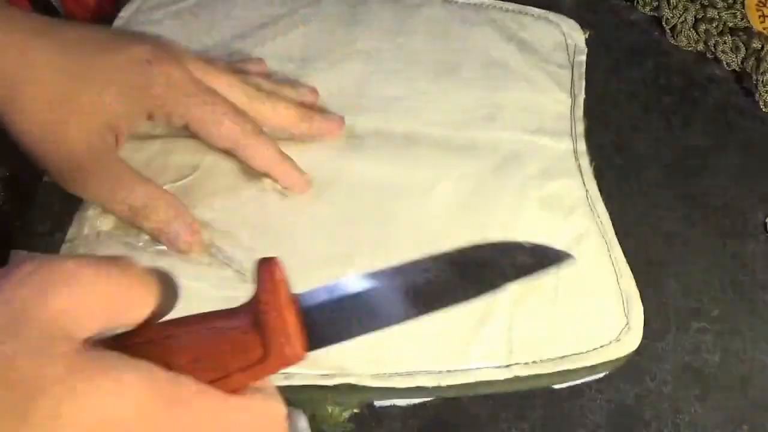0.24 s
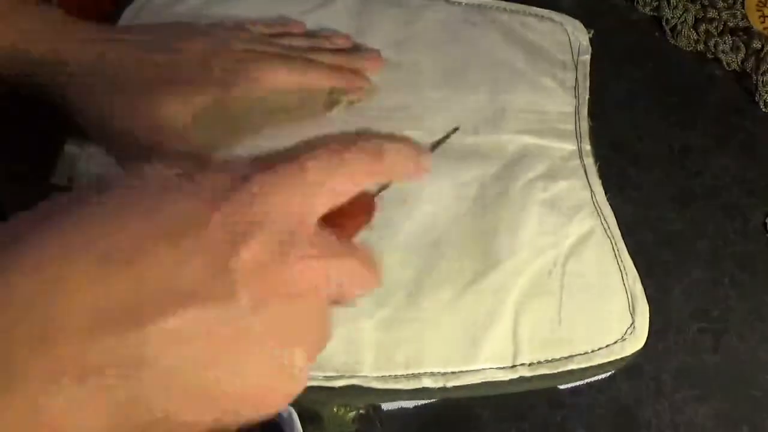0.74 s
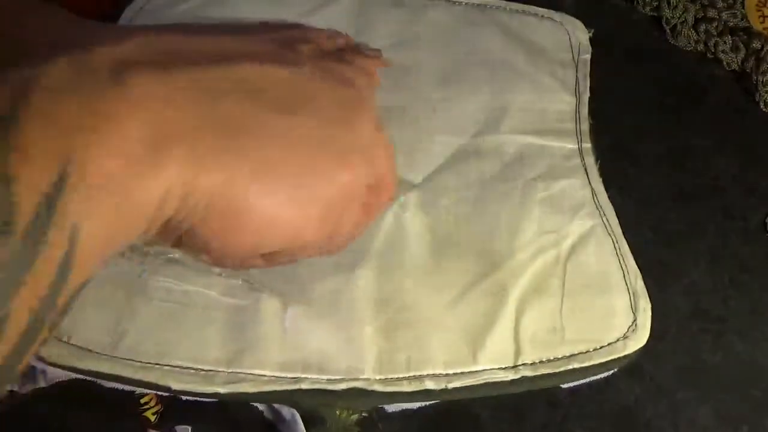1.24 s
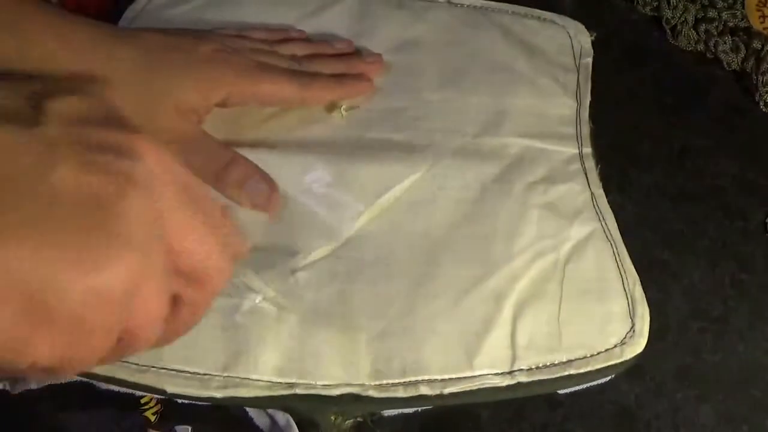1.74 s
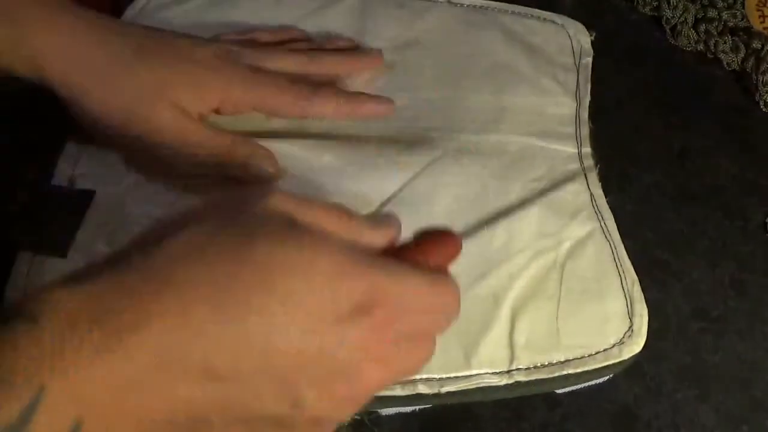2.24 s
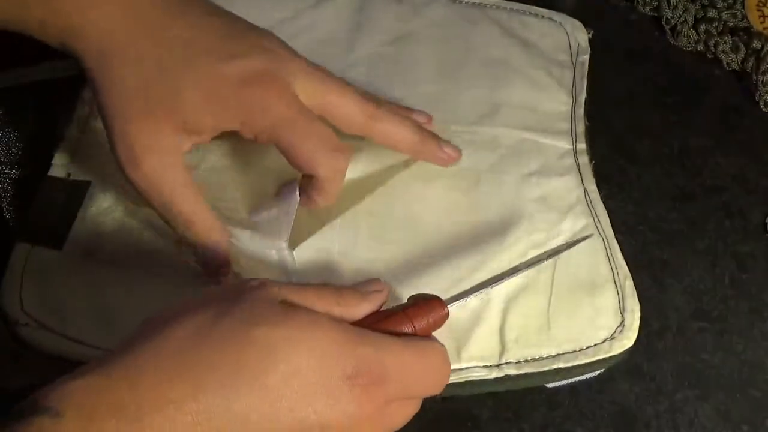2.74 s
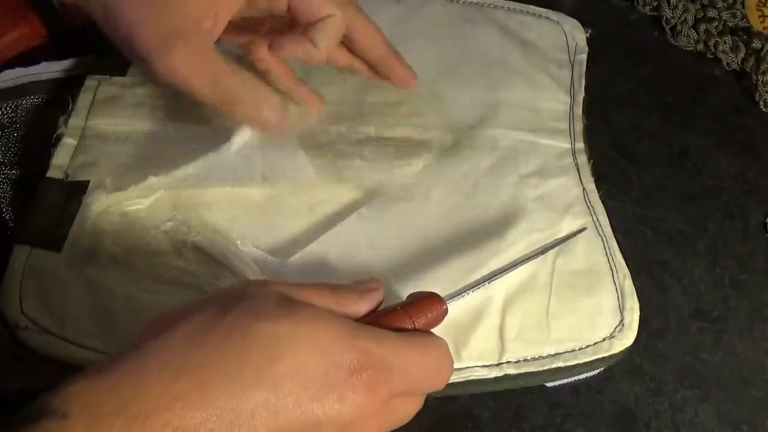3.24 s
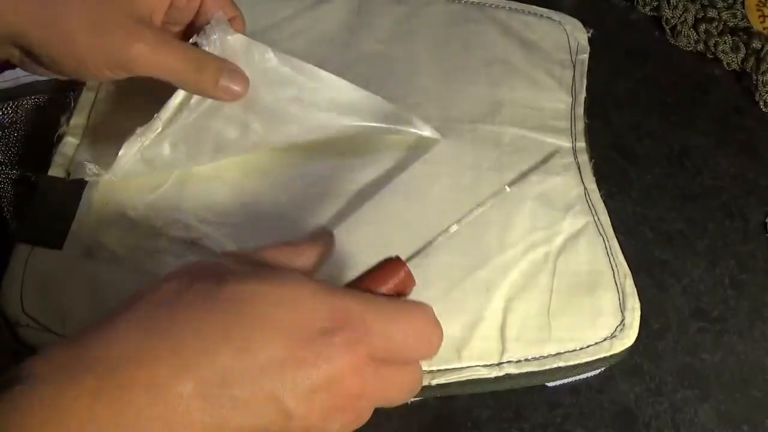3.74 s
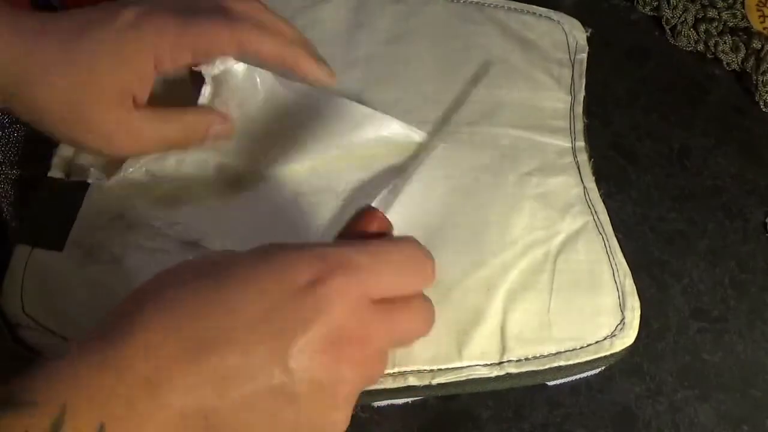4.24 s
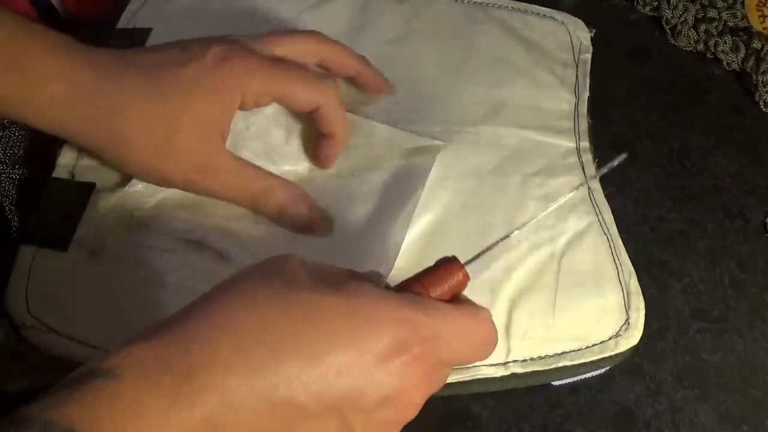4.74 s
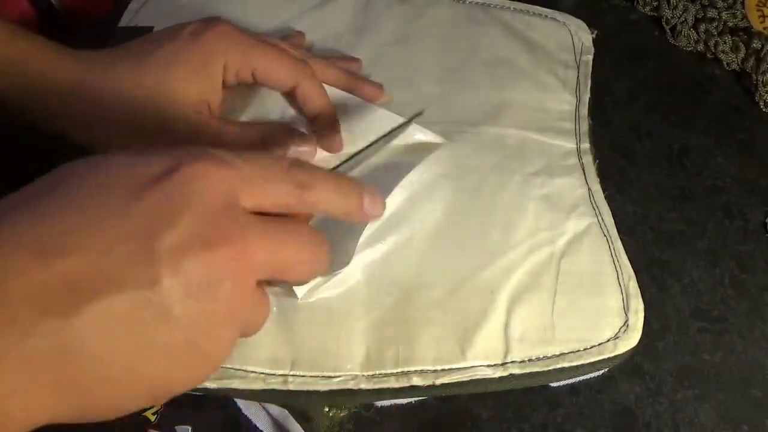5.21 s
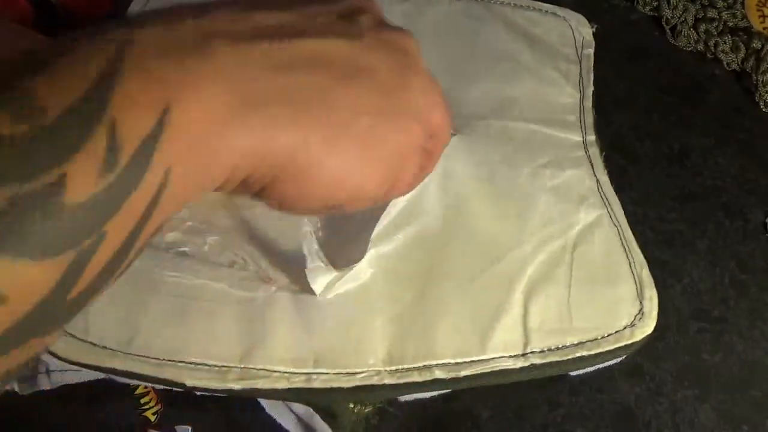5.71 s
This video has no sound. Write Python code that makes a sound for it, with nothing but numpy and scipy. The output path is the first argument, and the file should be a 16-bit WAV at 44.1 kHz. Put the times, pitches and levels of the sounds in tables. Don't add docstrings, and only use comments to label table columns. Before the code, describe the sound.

Up close, a blade rips hissing strokes through a tough padded cover, then fingers lift and crackle its plastic-lined flap before one last, stronger slit.

```python
import sys
import numpy as np
from scipy import signal
from scipy.fft import rfft, irfft
from scipy.io import wavfile
from scipy.ndimage import uniform_filter1d

SR = 44100
rng = np.random.default_rng(int(sys.argv[2]) if len(sys.argv) > 2 else 0)


def nominal_scale(level):
    x = np.asarray(level, float) / 20
    return 10 ** x


def file_out(sig):
    cols = np.atleast_2d(sig).T
    lim = np.clip(cols, -1, 1)
    pcm = np.round(lim * 32767).astype(np.int16)
    wavfile.write(sys.argv[1], SR, pcm)


N = 263277

# (start_s, end_s, blade_hz)
CUTS = [
    (1.12, 1.42, 1800),
    (5.62, 6.1, 2000),
]


def unit(x):
    return x / np.sqrt(np.mean(x ** 2) + 1e-30)


def band(x, lo_hz, hi_hz, order=2):
    return signal.sosfilt(signal.butter(order, [lo_hz, hi_hz], "bandpass", fs=SR, output="sos"), x)


def ring(x, modes):
    out = 0
    for k, (hz, width_hz, level_db) in enumerate(modes):
        out = out + (-1) ** k * nominal_scale(level_db) * band(x, hz - width_hz / 2, hz + width_hz / 2, order=1)
    return out


def walk(rate_hz):
    hold = int(SR / rate_hz)
    steps = np.repeat(rng.standard_normal(N // hold + 1), hold)
    return unit(uniform_filter1d(uniform_filter1d(steps, hold), hold)[:N])


def threads(n, share, spread_db, width):
    draw = rng.random((3, n))
    level_db = np.minimum(-spread_db * np.log(draw[0] + 1e-9), 30)
    size = nominal_scale(level_db) * (draw[1] < share)
    mid = size * np.sign(draw[2] - .5)
    return np.array([mid, width * mid * rng.standard_normal(n)])


def on_log_axis(hz, points):
    point_hz, point_db = np.array(points).T
    return nominal_scale(np.interp(np.log(hz), np.log(point_hz), point_db))


def room_tone():
    # (hz, level_db per Hz)
    room_curve = [(15, -37), (25, -15), (75, 7), (143, 4), (420, -10.5), (1090, -21), (2230, -9),
                  (2470, -32), (2730, -11), (4930, -14.5), (9860, -17), (10600, -16), (11500, -11),
                  (15000, -65), (22000, -120)]
    # (hz, side_minus_mid_db)
    side_curve = [(60, -17), (110, -10.5), (190, -4), (350, 6.5), (620, 14.5), (1120, 18), (2010, 4),
                  (3600, 1), (6460, 0.5), (11600, -1)]
    # (hz, width_hz, rms_db)
    hum_bands = [
        (53.2, 8.3, -65.5),
        (100.5, 5.2, -68),
        (192, 28, -71),
    ]
    hz = np.fft.rfftfreq(N, 1 / SR) + 1
    shape = on_log_axis(hz, room_curve)
    mid = irfft(rfft(rng.standard_normal(N)) * shape, N)
    side = irfft(rfft(rng.standard_normal(N)) * shape * on_log_axis(hz, side_curve), N)
    out = np.array([mid, side]) * nominal_scale(-68) / np.std(mid)
    for hum_hz, width_hz, rms_db in hum_bands:
        hum = band(rng.standard_normal(N), hum_hz - width_hz / 2, hum_hz + width_hz / 2, order=1)
        out[0] += nominal_scale(rms_db + .8 * walk(11)) * unit(hum)
    return out


def effort(share, drags_db, tugs_db, fade, rest_db):
    # (peak_s, rise_s, fall_s, hiss_db, weight_db on the sheet)
    drags = [(0.0, .1, 0.17, -33.5, -12), (.154, 0.11, 0.084, -37, -6.5), (.374, 0.16, 0.074, -60.5, -8),
             (.504, .065, 0.04, -59, -18), (.573, 0.022, 0.12, -53.5, -1), (.7, 0.24, 0.24, -66, -3.5),
             (.893, 0.054, 0.13, -60, -5), (1.135, 0.15, 0.54, -49.5, -8), (1.29, 0.28, 0.29, -41, -8),
             (1.385, 0.19, .09, -39.5, -11), (1.47, .1, 0.43, -53.5, -12), (1.55, 0.2, 0.12, -58, -11),
             (1.648, 0.26, 0.032, -49, -14), (1.7, .05, 0.09, -64, -14), (1.826, 0.37, .19, -52.5, -7),
             (2.17, 0.15, 0.35, -57, -6.5), (2.2, 0.014, 0.043, -56, -1), (2.235, 0.066, 0.091, -54, 0),
             (2.265, .09, 0.088, -46, -3.5), (2.295, 0.053, 0.031, -53, -3), (5.57, 0.51, 0.24, -62, -1.5),
             (5.69, 0.14, 0.64, -41, -4), (5.91, 0.15, 0.55, -35.5, -3)]
    # (peak_s, rise_s, fall_s, hiss_db, weight_db on the sheet)
    tugs = [(2.5, 0.17, 0.13, -56, -6.5), (2.819, 0.16, 0.093, -52.5, -11.5),
            (2.935, 0.045, 0.069, -43, -8), (2.993, 0.037, 0.076, -50.5, 7), (3.078, 0.099, 0.051, -46, -8),
            (3.253, 0.21, 0.13, -59.5, -10), (3.375, .015, .05, -50.5, -11),
            (3.397, 0.027, 0.025, -42, -16.5), (3.435, 0.09, 0.04, -49.5, -9),
            (3.532, 0.099, 0.27, -55, -8.5), (3.86, 0.36, 0.52, -67.5, 2), (3.98, 0.34, 0.21, -56, -11),
            (4.121, 0.096, 0.39, -49, -4), (4.295, 0.14, 0.13, -46.5, -6),
            (4.335, 0.067, 0.18, -52.5, -4.5), (4.548, 0.075, 0.036, -50.5, -6),
            (4.679, 0.29, 0.47, -47.5, -8.5), (4.834, 0.41, 0.085, -51.5, -2.5),
            (4.984, 0.17, 0.22, -61, -5), (5.105, 0.078, 0.1, -50.5, -8.5), (5.148, 0.036, 0.042, -53, 0),
            (5.313, 0.012, 0.029, -63, 12.5), (5.418, 0.038, 0.039, -53.5, -2)]
    fade_db, fade_bend = 24, 1.073
    t = np.arange(0, N + 64, 64) / SR
    power = nominal_scale(2 * rest_db)
    for rows, kind_db in ((drags, drags_db), (tugs, tugs_db)):
        for s, rise, fall, hiss_db, weight_db in rows:
            away = np.maximum((s - t) / max(rise, .01), (t - s) / max(fall, .01))
            peak_db = hiss_db + kind_db + share * weight_db
            power = power + nominal_scale(2 * (peak_db - fade * fade_db * away ** fade_bend))
    return np.interp(np.arange(N) / SR, t, 10 * np.log10(power))


def patchy(x, edges_hz, patchy_db):
    out = 0
    for k, (lo, hi) in enumerate(zip(edges_hz, edges_hz[1:])):
        out = out + nominal_scale(patchy_db * walk(17)) * band(x, lo, hi) * (-1) ** k
    return unit(out)


def blade_ridge(sheet):
    # (hz, width_hz, level_db)
    sheet_modes = [(1200, 330, -10), (1890, 138, 5), (2570, 1030, -1.5), (3264, 660, 3)]
    t = np.arange(N) / SR
    out = unit(.5 * band(sheet, 870, 3330, order=1) + ring(sheet, sheet_modes))
    for start, end, hz in CUTS:
        share = .75 * np.clip(np.minimum(t - start, end - t) / .05, 0, 1)
        out = (1 - share) * out + share * unit(band(sheet, hz - 260, hz + 300, order=1))
    return out


def rubbing():
    # (share of the weight, drags_db, tugs_db, share of the fade, rest_db)
    layers = [
        (0.015, -1.06, -0.34, 1.007, -73.5),
        (0.42, -6, -2.1, 0.94, -75.5),
        (.99, -0.8, 1, 0.91, -73),
        (1, -6.5, -2.5, 0.84, -70),
        (0.67, -17, -23, 0.59, -84),
        (1, -53, -11.5, 1.26, -84),
    ]
    # (hz, width_hz, level_db)
    table_modes = [
        (190, 31, -4),
        (365, 460, -24),
    ]
    hiss_db, blade_db, sheet_db, pad_db, table_db, stuffing_db = (effort(*layer) for layer in layers)

    grip = nominal_scale(1.1 * walk(70) + 1.2 * walk(250))
    fine = grip * threads(N, share=.25, spread_db=2.0, width=0.35)
    coarse = grip * threads(N, share=.25, spread_db=2.0, width=0.35)

    fibres = patchy(fine, np.geomspace(5800, 12500, 5), patchy_db=0.85) * np.std(fine)
    fibre_peak = nominal_scale(0.87 * walk(35)) * band(fine, 9360, 9800, order=1)
    hiss = unit(0.48 * fibres + 0.52 * fibre_peak)
    out = nominal_scale(hiss_db + 0.61 * walk(60)) * hiss * np.array([[1], [.7]])

    blade = patchy(coarse, np.geomspace(3200, 6600, 5), patchy_db=1.8)
    out += nominal_scale(blade_db + 1.1 * walk(50)) * blade

    sheet = band(fine, 960, 2520, order=1)
    out += nominal_scale(sheet_db + 0.64 * walk(40)) * blade_ridge(sheet)

    pad = unit(band(coarse, 280, 1000))
    out += nominal_scale(pad_db + 1.8 * walk(45)) * pad * np.array([[1], [.7]])
    stuffing = unit(band(coarse, 290, 450))
    out += nominal_scale(stuffing_db + 2.2 * walk(22)) * stuffing * np.array([[1], [.5]])

    t = np.arange(N) / SR
    press = sum(np.clip(np.minimum(t - start, end - t) / .02, 0, 1) for start, end, _ in CUTS)
    table = unit(ring(band(fine, 184, 540), table_modes))
    return out + nominal_scale(table_db + 3.5 * press) * table * np.array([[1], [.3]])


def sings():
    # (middle_s, half_length_s, pitch_hz, rms_db)
    slides = [(0.02, .03, 7830, -46), (1.19, .04, 7170, -56), (2.245, .012, 1930, -52),
              (2.268, .008, 2100, -51), (3.398, 0.0051, 2730, -52), (3.434, 0.0048, 3300, -56),
              (3.445, 0.004, 3300, -51), (4.264, 0.039, 4480, -56), (4.324, 0.013, 5700, -52),
              (4.328, .015, 4310, -51.5), (4.687, .035, 8600, -61), (4.742, .03, 3890, -57),
              (4.82, 0.04, 4400, -58), (4.84, .03, 3930, -62), (4.987, .012, 8200, -64),
              (5.026, .022, 8110, -64), (5.075, .03, 1260, -60.5), (5.117, 0.027, 1280, -58.5),
              (5.16, 0.012, 1400, -56)]
    width_hz = 255
    t = np.arange(N) / SR
    clicks = threads(N, share=0.22, spread_db=2.5, width=0.27)
    out = 0
    for s, half, hz, rms_db in slides:
        swell = np.exp(-((t - s) / half) ** 4)
        out = out + nominal_scale(rms_db) * swell * unit(band(clicks, hz - width_hz / 2, hz + width_hz / 2))
    return out


def camera_tick():
    first_s, period_s, length_s = .01, .04, .0026
    t = np.arange(N) / SR
    lag = (t - first_s + period_s / 2) % period_s - period_s / 2
    blip = np.exp(-(lag / length_s) ** 2) * np.sin(2 * np.pi * 2460 * lag)
    return nominal_scale(-61.5 + 1.2 * walk(25)) * blip * np.array([[1], [.1]])


def burst(t60, rattle_db, crack):
    t = np.arange(8192) / SR
    rattle = unit(threads(8192, share=0.33, spread_db=4.0, width=0.29))
    out = nominal_scale(rattle_db - 60 * t / np.clip(t60, .01, .3)) * rattle
    out[:, :len(crack)] += crack * np.array([[1], [0.12 * rng.standard_normal()]])
    return out


def add(out, s, peak_db, y):
    at = int(s * SR)
    out[:, at:at + y.shape[1]] += nominal_scale(peak_db) * y / np.max(np.abs(y[0]))


def knocks():
    # (start_s, peak_db, low_hz, fold_mode_db)
    tip_taps = [(.557, -39, 565, 3), (.571, -33.5, 550, 0), (.158, -34.5, 546, -17), (.315, -52, 530, -15),
                (.389, -50, 700, -7), (.8793, -24.5, 760, -4.5), (.8804, -24, 666, -9),
                (.8865, -32, 597, -24), (1.348, -34.5, 660, -5), (2.1925, -34.5, 684, -1.5),
                (2.4095, -42.5, 583, -9), (3.512, -43.5, 1180, -8), (4.909, -47, 740, -13)]
    wide_folds = [(0.1405, -31, 820, 1), (2.343, -47, 730, -13), (2.364, -40.5, 700, -1),
                  (2.833, -33.5, 495, 5), (2.937, -22, 750, -5.5), (2.945, -29, 1300, 0),
                  (2.985, -19.5, 1150, -13), (3.342, -43, 1200, -4), (4.161, -36, 1120, 6),
                  (4.1678, -29, 1140, -5.5), (4.284, -35, 1150, -1), (4.293, -26.5, 1117, 0.5),
                  (4.32, -37, 1210, 3), (4.8365, -31, 1230, -20), (5.101, -46, 1270, -30)]
    flap_folds = [(1.992, -45, 760, -6), (2.171, -33.5, 1250, 22), (2.9809, -10.5, 740, 1),
                  (2.9833, -7.5, 1170, 8), (2.994, -33, 1150, 5), (3.062, -35.5, 1200, -12),
                  (3.189, -44, 665, 10), (3.394, -41, 1150, 20), (3.408, -45, 1500, 0),
                  (3.6446, -34, 1130, 23), (3.848, -46, 580, -16), (4.108, -21, 513, 3),
                  (4.115, -15.5, 1200, -0.7), (4.246, -37, 1160, -11), (4.277, -36, 1150, -8),
                  (4.463, -38, 904, 22), (4.666, -28.5, 815, -4.5), (4.6686, -29.5, 900, -3),
                  (4.706, -39, 980, -14), (5.145, -24.5, 1280, -8.5), (5.31, -24.5, 1125, -3.5),
                  (5.408, -25.5, 1120, -4), (5.45, -42, 700, -21)]
    tight_folds = [(2.925, -28, 1700, 6.2), (2.9376, -23, 760, 11), (2.994, -25, 1400, 10),
                   (3.373, -48, 990, 3.5), (3.43, -53, 1450, 6), (3.4438, -32.5, 1100, 4.5),
                   (3.685, -39.5, 1020, 3)]
    # mode hz, and rattle decay t60_s
    fold_modes_hz = (1776, 2040, 2510, 3300)
    fold_decays_s = (0.078, 0.077, 0.042, 0.041)
    # (hz, width_hz, level_db)
    pad_modes = [
        (417, 297, -3),
        (704, 60, -23),
    ]
    out, push = np.zeros((2, N + 8192)), np.hanning(11)
    kinds = (tip_taps, wide_folds, flap_folds, tight_folds)
    for rows, fold_hz, t60 in zip(kinds, fold_modes_hz, fold_decays_s):
        for s, peak_db, low_hz, high_db in rows:
            high_hz = fold_hz * (1 + 0.0038 * rng.standard_normal())
            hit = band(burst(t60, rattle_db=-14.5, crack=push), 110, 10500, order=1)
            click = [(low_hz, 0.38 * low_hz, 0), (high_hz, .5 * high_hz, high_db)]
            after = [(low_hz, 130, 3), (high_hz, 110, high_db + 3.5)]
            add(out, s, peak_db, ring(hit, click) + ring(hit, after) + 0.18 * ring(hit, pad_modes))
    return out[:, :N]


def crackles():
    # (start_s, peak_db, brightest_hz, rattle_db under the crack)
    shut = [(.1415, -8.5, 9750, -15), (.307, -46, 5600, -4), (.296, -47, 10000, -12),
            (.3885, -36, 7500, -18), (.5556, -30, 10000, -7), (.879, -32.5, 7540, 6),
            (1.492, -33, 9540, -15), (1.505, -34, 8350, -9), (1.535, -33, 9000, -12),
            (1.562, -33.5, 8550, -10.5), (1.659, -33, 8500, -14), (1.6935, -37.5, 9000, -12),
            (1.7104, -32, 8000, -18), (1.719, -23.5, 10400, -16.5), (1.807, -34, 8850, -8),
            (1.837, -37, 8000, -10), (1.874, -41, 9500, -10), (2.17, -29.5, 10100, -20),
            (2.1926, -21.5, 10300, -9), (2.1985, -39, 10000, -14), (2.2075, -40, 9900, -10),
            (2.3415, -36, 9040, -4), (2.3642, -25.5, 9350, -14), (2.3715, -33, 7450, -15),
            (2.378, -43, 7800, -12), (2.5296, -34.5, 9860, -21), (2.5494, -38, 10400, -14),
            (2.558, -43, 7040, -14), (2.58, -49, 5500, -10), (2.637, -47, 5000, -8),
            (2.655, -44, 9870, -10), (2.667, -47, 5500, -14), (2.712, -43.5, 8450, 0),
            (2.722, -43, 7500, -3), (2.8, -41, 7000, -7), (2.834, -28, 10300, -3),
            (2.9243, -19, 10600, -22), (2.9364, -23, 8550, 3), (2.9775, -25, 5000, 6),
            (2.9801, -10.5, 9900, 14)]
    # (start_s, peak_db, brightest_hz, rattle_db under the crack)
    opened = [(3.023, -27, 8000, 9), (3.0649, -25, 6550, 8), (3.1652, -39, 10100, -3),
              (3.1892, -36.5, 10600, -3.5), (3.338, -34, 10400, -5), (3.3735, -34, 10600, 0),
              (3.394, -32, 9300, -11), (3.3962, -26.5, 9800, -17), (3.416, -35, 8500, -8),
              (3.4438, -27, 9500, -17), (3.542, -35, 4300, -18), (3.6095, -34, 9400, -1),
              (3.6447, -27, 5570, -11), (3.6852, -25.5, 6460, -4), (3.9569, -39.5, 6070, -6),
              (3.9936, -40, 8500, -14), (4.031, -35.5, 8660, -3.5), (4.1074, -25, 4270, -2),
              (4.1152, -17.5, 3930, 8), (4.1465, -24, 9400, -2), (4.277, -28, 5500, -8),
              (4.463, -37, 7570, -1), (4.5446, -37, 4970, -1.1), (4.6503, -35, 5800, -3),
              (4.666, -26, 9600, 3), (4.7706, -31, 6760, 4), (4.79, -33, 6000, 3), (4.8344, -38, 4470, -4),
              (5.1444, -28.5, 7250, -17), (5.2959, -35, 10000, 6), (5.3093, -38.5, 8400, -3),
              (5.4086, -35.5, 9540, -1.1)]
    out, k = np.zeros((2, N + 8192)), np.arange(80)
    for rows, t60 in ((shut, 0.059), (opened, 0.066)):
        for s, peak_db, hz, rattle_db in rows:
            tone = np.cos(2 * np.pi * hz * k / SR)
            crack = 2 * np.exp(-k / 14) * (tone + .6 * rng.standard_normal(80))
            snap = burst(t60, rattle_db, crack)
            hit = band(snap, 3750, 14740) + 0.23 * band(snap, 1500, 3800, order=1)
            add(out, s, peak_db, 0.71 * hit + 0.54 * band(hit, 1.04 * hz, 1.17 * hz, order=1))
    return out[:, :N]


def thuds():
    # (start_s, peak_db, low_hz, upper_mode_db, deep_mode_db)
    strikes = [(0.154, -26.5, 196, -6.5, -11), (.275, -52, 111, -8, 3), (.562, -45.5, 133, 4, -15),
               (.63, -50, 143, 2, 3), (.879, -33.5, 181, -5, -10), (1.3, -52, 110, -8, -3),
               (1.345, -54, 105, -4, -3), (2.515, -47.5, 233, -1, -17), (2.937, -26, 210, 12.5, -18),
               (2.982, -19, 217, 10, -22.5), (3.0596, -31, 187, 2, -19), (3.345, -50, 119, 0, 8),
               (3.38, -50, 110, 3, 4), (3.686, -40, 245, 9, -24), (4.113, -25, 220, 11.5, -24),
               (4.25, -44, 300, 1, -13), (4.298, -34, 255, 21, -16), (5.144, -42.5, 225, 4, -20),
               (5.307, -39.5, 222, 12, -20.5), (5.406, -38.5, 159, 13, -15), (5.63, -52, 110, -4, 6),
               (5.877, -47, 192, 5, -5), (5.935, -45, 188, -10, -15)]
    out, t = np.zeros((1, N + 16384)), np.arange(16384) / SR
    for s, peak_db, hz, upper_db, deep_db in strikes:
        t60 = 11.9 / hz * np.exp(-0.1171 * upper_db)
        low = np.sin(2 * np.pi * hz * t)
        upper = nominal_scale(upper_db - 40 * t / t60) * np.sin(2 * np.pi * 420 * t)
        top = (low + upper) * nominal_scale(-60 * t / t60)
        top += .14 * np.sin(2 * np.pi * .9 * hz * t) * nominal_scale(-60 * t / (2.4 * t60))
        deep = nominal_scale(deep_db - 60 * t / 0.28) * np.sin(2 * np.pi * 70 * t) * (1 - np.exp(-t / 0.0043))
        add(out, s + 0.00177, peak_db, (1 - np.exp(-t / 0.001)) * (top + deep)[None])
    return out[:, :N] * np.array([[1], [.08]])


def scene():
    near = rubbing() + knocks() + crackles() + thuds() + sings()
    t = np.arange(8192) / SR
    tail = rng.standard_normal((2, 8192)) * nominal_scale(-60 * t / 0.082) * (t > .003)
    tail *= 1 + 0.79 * np.exp(-((t - .007) / 0.001) ** 2)
    tail = nominal_scale(-15) * tail / np.sqrt(np.sum(tail[0] ** 2))
    tail[1] = .5 * band(tail[1], 450, 6000, order=1)
    reverb = signal.fftconvolve(near[:1], tail, axes=1)[:, :N]
    mid, side = near + reverb + room_tone() + camera_tick()
    return np.array([nominal_scale(-0.1) * (mid + side), mid - side])


def roll_off(x):
    return signal.sosfilt(signal.butter(12, 12200, fs=SR, output="sos"), x)


def record(dry):
    firm = signal.sosfilt(signal.butter(2, 38, "highpass", fs=SR, output="sos"), dry)
    mix = signal.sosfilt(signal.ellip(12, .5, 48, 10980, fs=SR, output="sos"), firm)
    return roll_off(mix)


dry = scene()
out = record(dry)
file_out(out)
```